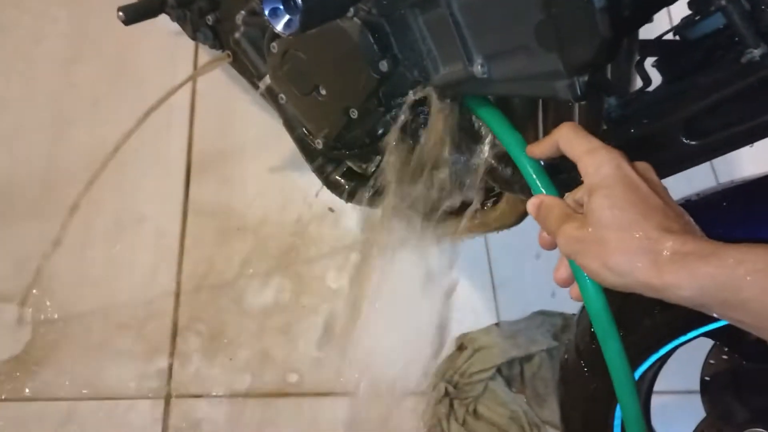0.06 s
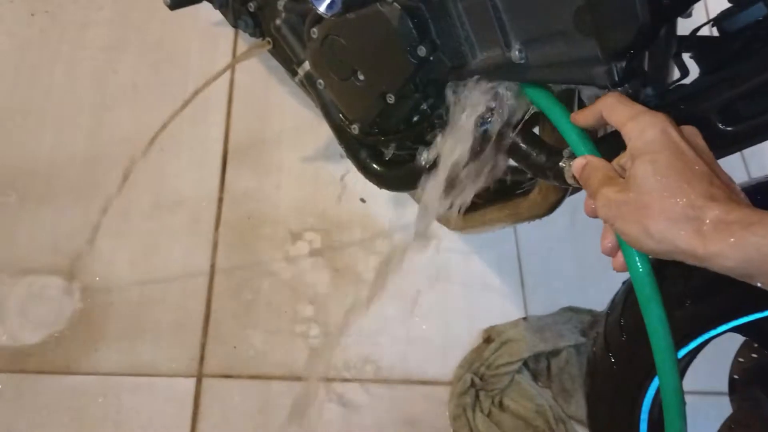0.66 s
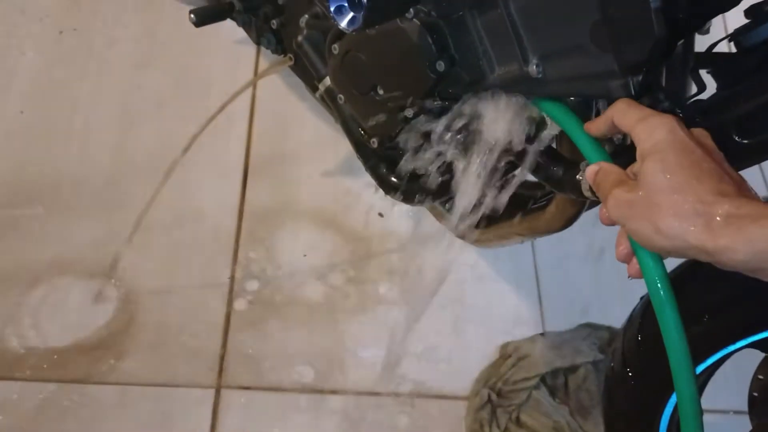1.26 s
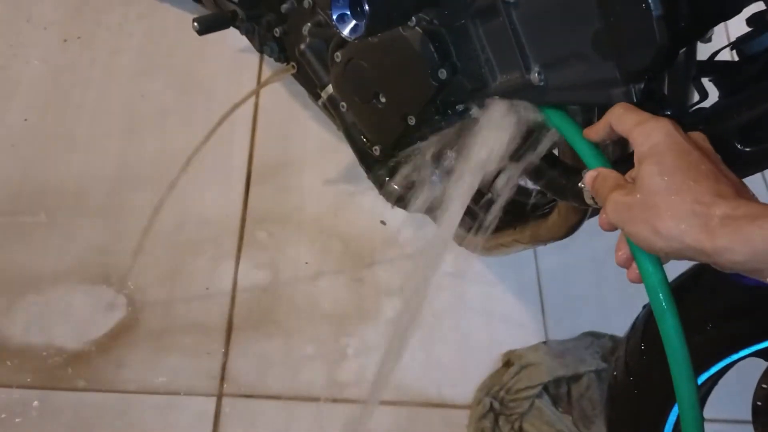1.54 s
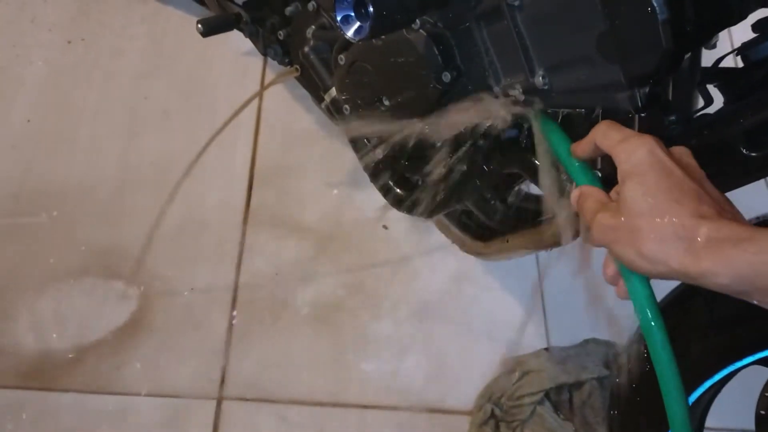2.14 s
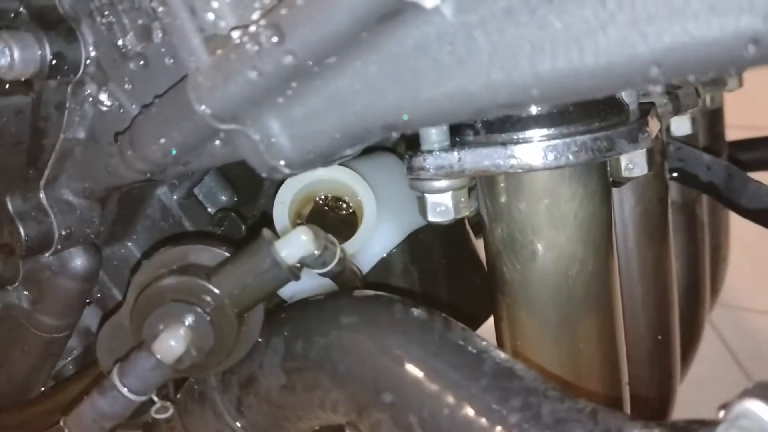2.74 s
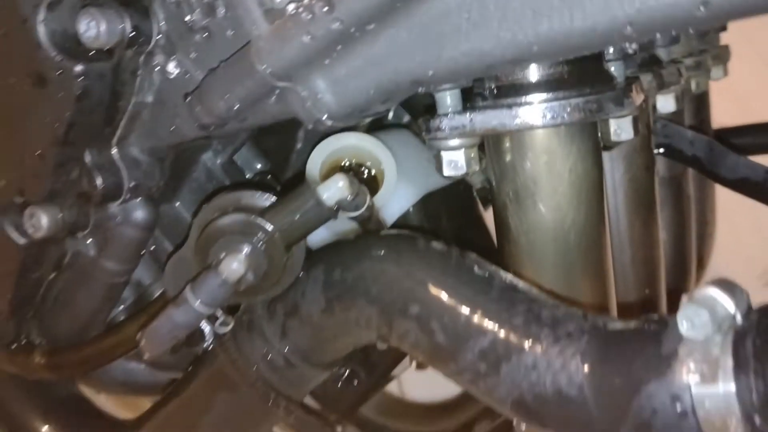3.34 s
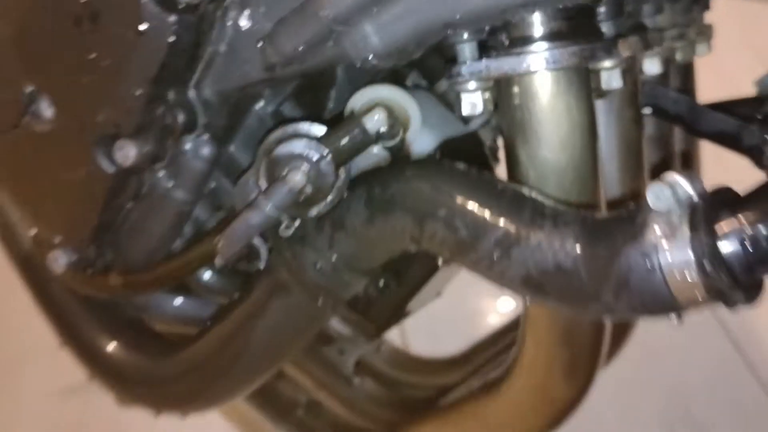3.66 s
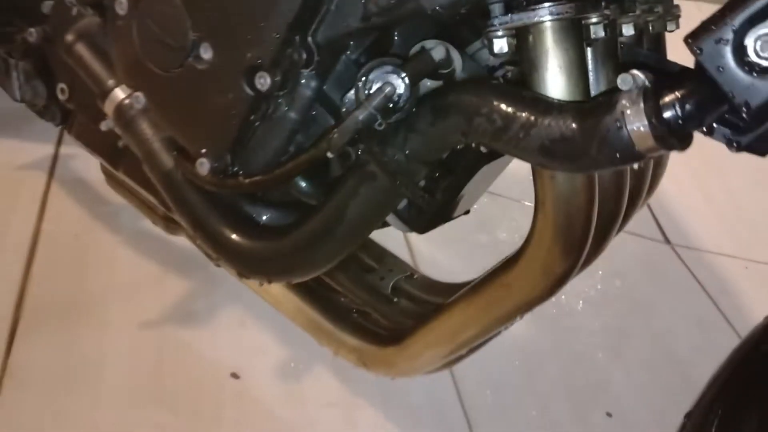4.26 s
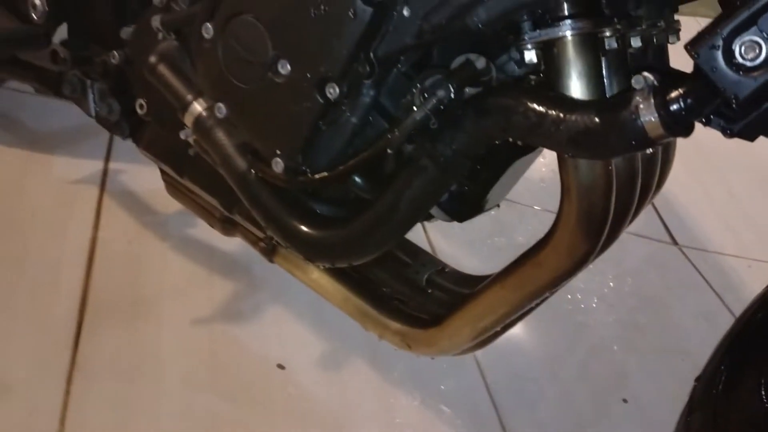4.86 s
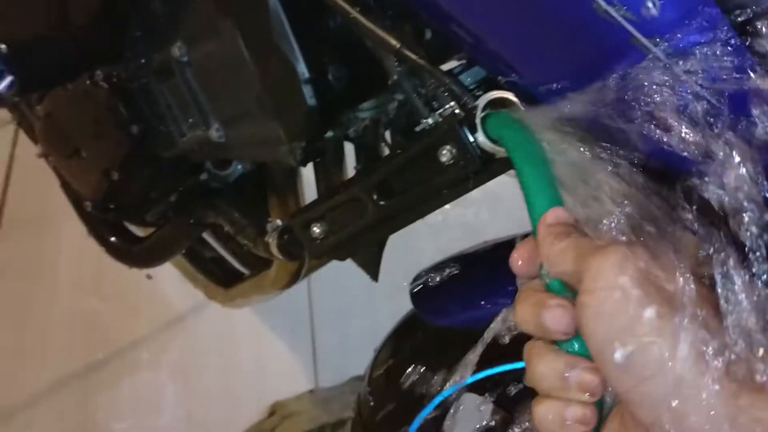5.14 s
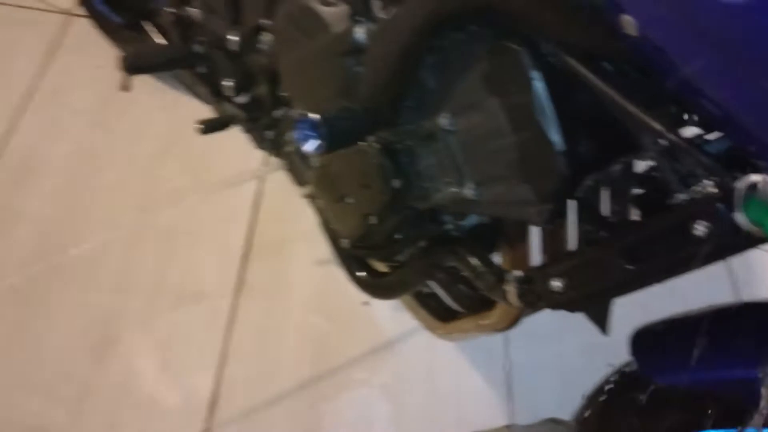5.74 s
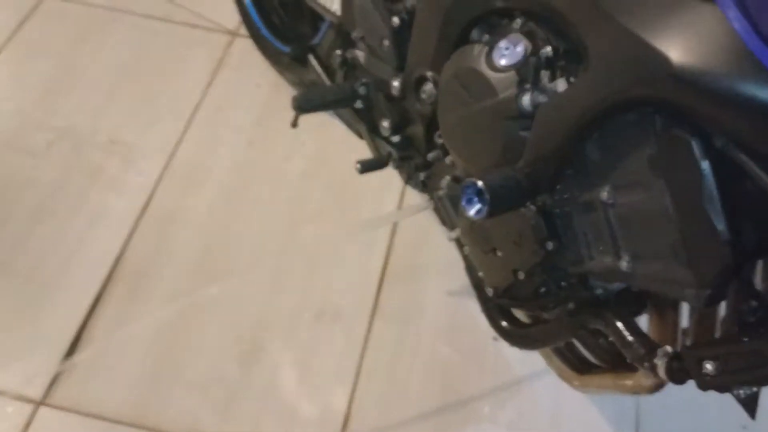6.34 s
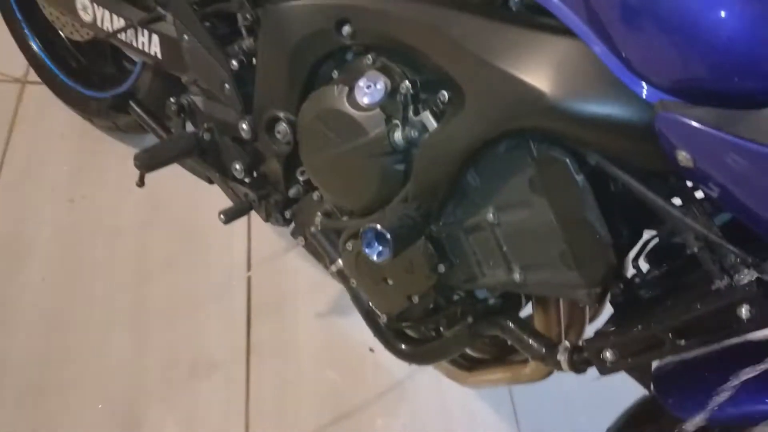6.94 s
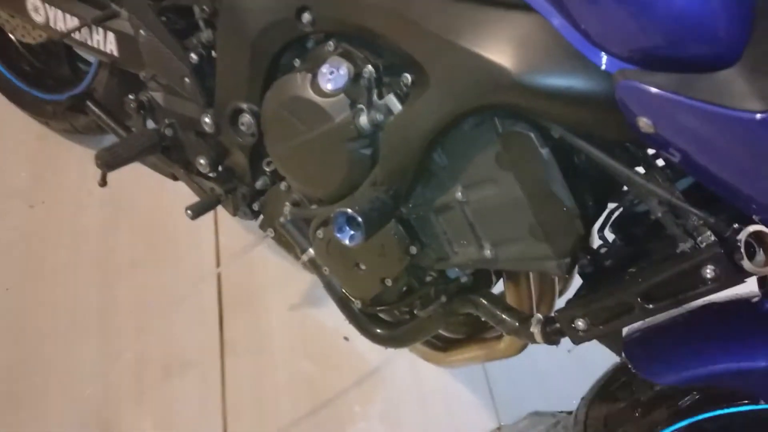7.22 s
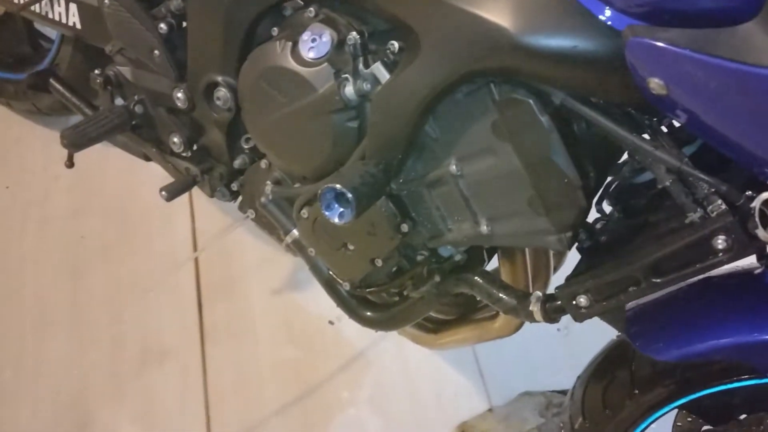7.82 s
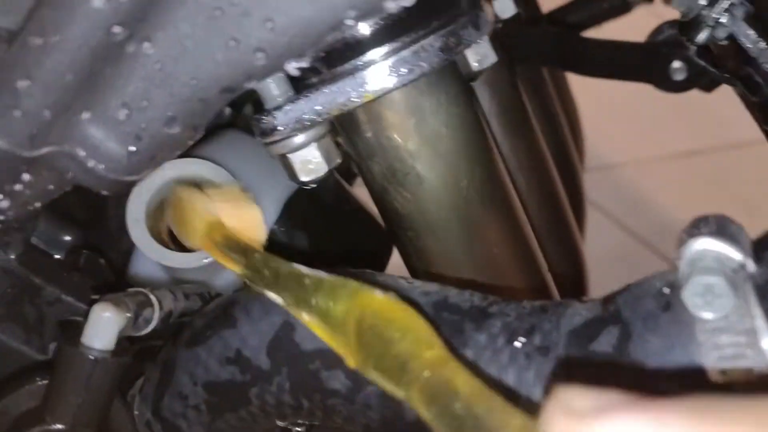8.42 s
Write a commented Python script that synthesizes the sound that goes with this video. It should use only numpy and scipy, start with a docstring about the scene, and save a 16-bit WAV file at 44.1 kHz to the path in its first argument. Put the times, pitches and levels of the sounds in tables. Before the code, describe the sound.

Close up in a tiled workshop, a full stream of water pours over an engine and splatters unevenly on the floor. Suddenly only thin runoff and ticking drips remain. A softer hissing rinse follows, with scattered popping drops, until a low machine hum takes over and bristles briefly flick and scrub. The microphone takes occasional soft handling thuds, and traffic hums very faintly far away.

```python
"""Hose water gushes off a motorcycle engine and slaps the floor of a tiled workshop, close to the mic.
Three hard cuts follow: the wet engine drips; a gentler stream patters over the bodywork; a small brush
taps and scrubs a fitting over a machine's rumble. The water is a mass of tiny impacts and ringing air
bubbles, with heavy gobs and drops that crack and pop. Traffic hums far off, and now and then the hand
bumps the narrow-band microphone."""
import sys
import numpy as np
from scipy import signal
from scipy.fft import rfft, irfft
from scipy.io import wavfile

SR = 44100
rng = np.random.default_rng(int(sys.argv[2]) if len(sys.argv) > 2 else 0)


def generate_wav(sig):
    """Save sig (samples, or channels by samples) to the path in sys.argv[1] as 16-bit PCM at SR."""
    pcm = np.round(np.clip(np.atleast_2d(sig).T, -1, 1) * 32767).astype(np.int16)
    wavfile.write(sys.argv[1], SR, pcm)


N = 383229
T = np.arange(N) / SR
DRIP_START, RINSE_START, BRUSH_START = 2.508, 5.035, 8.065   # the cuts, in seconds

# Strength of the three streams, heard as fine spray. Each row: time in seconds, relative level in dB.
GUSH_FLOW = [(0, -47.5), (0.36, -48.5), (0.54, -47.5), (0.68, -43.5), (0.92, -44.5), (1.12, -45),
             (1.3, -45.5), (1.5, -45), (1.68, -46.5), (1.92, -44.0), (2.06, -46.5), (2.3, -47), (2.5, -45)]
TRICKLE_FLOW = [(2.53, -71.5), (2.8, -76.5), (3.45, -71.5), (3.65, -77.5), (3.9, -73.5), (4.3, -71.5),
                (5.02, -73)]
RINSE_FLOW = [(5.05, -61.5), (5.55, -61.5), (5.95, -65), (6.07, -67.0), (6.25, -63.5), (6.55, -64.5),
              (6.78, -59.5), (6.9, -68.5), (7.15, -60.5), (7.57, -67), (7.68, -61.5), (8.05, -63.5)]
# Tone of each stream at the mic. Each row: frequency in Hz, relative level in dB.
GUSH_SPECTRUM = [(150, -35.5), (270, -22), (400, -21), (700, -18), (1350, -16.5), (1900, -6.5),
                 (2400, -2.5), (3100, -2), (4200, -2.5), (5100, -5), (6300, 0), (8000, -2)]
TRICKLE_SPECTRUM = [(800, -20.5), (2000, -16.5), (3600, -12), (5000, -5.5), (7000, 4.5)]
RINSE_SPECTRUM = [(300, -5.5), (1400, -19.5), (2200, -13), (3100, -6), (4100, 0.5), (5100, -5.5), (7200, 6),
                  (8000, 0.5)]
# The biggest gobs slapping the floor. Each row: start in seconds, relative peak in dB, pop pitch in Hz.
FLOOR_SPLATS = [(0.052, -30, 6420), (0.1389, -32, 5600), (0.1882, -29.5, 6500), (0.2519, -28, 3970),
                (0.2835, -29.5, 4430), (0.413, -31.5, 2480), (0.4368, -26, 6160), (0.6431, -28, 2940),
                (0.7628, -26.5, 2700), (0.8596, -27.5, 5870), (0.8998, -25.5, 2720), (0.9514, -30, 2990),
                (1.2175, -27.5, 2740), (1.2728, -24.5, 6600), (1.3853, -31, 6860), (1.4428, -27, 5950),
                (1.4663, -27, 6080), (1.5696, -28.5, 4100), (1.6434, -33.5, 5780), (1.8417, -29.5, 3270),
                (1.964, -29, 7000), (1.987, -27.5, 3850), (2.1857, -29, 4240), (2.2379, -29, 4980),
                (2.4242, -24.5, 2500)]
# Room tone, held until the next row. Each row: start in seconds, relative rumble and air levels in dB.
ROOM_LEVELS = [(0.0, -60.5, -69.5), (DRIP_START, -71, -85.5), (RINSE_START, -74, -83)]
# The workshop's rumble and air. Each row: frequency in Hz, relative level in dB.
RUMBLE_SPECTRUM = [(15, 0), (35, 2), (60, -7.5), (105, -5.5), (160, -15), (250, -29), (1500, -71.5)]
AIR_SPECTRUM = [(100, -19), (260, -0.5), (450, -3.5), (800, -3.5), (1150, 0), (1500, -2.5), (2300, -9.5),
                (8000, -13)]
# Handling thuds on the mic. Each row: start in seconds, peak in dB.
MIC_BUMPS = [(0.247, -48), (0.438, -49), (0.617, -51.5), (1.281, -45), (1.55, -47), (2.179, -45.5),
             (2.462, -36), (3.843, -58), (3.952, -51), (4.02, -55.5), (4.157, -55), (4.792, -47.5),
             (4.909, -56), (6.238, -60)]
# Surfacing bubbles. Each row: start in seconds, dry peak in dB, first pitch in Hz, rise in octaves,
# length in seconds.
BUBBLE_CHIRPS = [(0.412, -42.5, 2260, 0.21, 0.017), (0.764, -42, 2620, 0.093, 0.01),
                 (0.955, -36.5, 2870, 0.106, 0.0054), (2.328, -50, 1210, 0.18, .016),
                 (3.496, -66.5, 3000, 0.66, 0.0089), (5.55, -45.5, 1710, 1.8, 0.0057),
                 (5.918, -51.5, 1887, 1.5, 0.007)]
# Engines far off. Each row: start and length in seconds, pitch in Hz, level before flutter in dB.
FAR_ENGINES = [(1.9, 0.71, 119.7, -67), (3.3, 0.73, 97.5, -69.5), (5.05, 1.73, 362.5, -82.5),
               (6.4, 0.7, 104, -78), (6.99, 0.4, 134.3, -77.5), (7.253, 0.46, 260, -82.5)]
# The biggest single drops. Each row: start in seconds, relative peak in dB, pop pitch in Hz.
BIG_DROPS = [(2.6249, -48, 6800), (2.6917, -52, 7040), (2.9567, -58, 6100), (3.1397, -51, 7650),
             (3.2781, -52, 7040), (3.711, -55, 6660), (3.863, -51.5, 7000), (3.9133, -54, 5300),
             (3.9893, -51, 6900), (4.1063, -50.5, 6740), (4.2203, -48.5, 6200), (4.4077, -45, 7200),
             (4.5839, -51, 4130), (4.873, -55, 6800), (5.0853, -49, 4490), (5.3222, -48, 4000),
             (5.3778, -49, 4100), (5.4704, -43, 6240), (5.6015, -45, 3330), (5.7557, -46.5, 7800),
             (5.8484, -49.5, 3300), (5.916, -45, 2260), (5.9846, -47, 3940), (6.1621, -40, 6560),
             (6.7433, -44.5, 5690), (7.0023, -38.5, 7200), (7.1612, -45.5, 3370), (7.2464, -48.5, 2980),
             (7.3501, -40.5, 7250), (7.653, -48.5, 7400)]
# Sheets of water sliding off the bodywork. Each row: start and length in seconds, level in dB,
# centre and bandwidth in Hz.
WATER_SHEETS = [(5.545, 0.033, -66, 2900, 1500), (6.01, 0.18, -81.5, 1000, 704),
                (6.42, 0.21, -81.5, 900, 700), (6.63, 0.079, -68.5, 2760, 894),
                (6.69, 0.14, -77, 1240, 910), (7.055, .05, -71, 2360, 700),
                (7.351, 0.047, -59.5, 2723, 1200), (7.68, 0.2, -75.5, 980, 704), (7.82, 0.3, -77, 570, 450)]
# The machine's rumble. Each row: frequency in Hz, relative level in dB.
MACHINE_SPECTRUM = [(15, -26), (25, 5.5), (76, -4.5), (144, -12.5), (283, -15.5), (327, -19.5),
                    (436, -18.5), (740, -26), (1010, -25), (1320, -32), (1980, -33.5), (2400, -35.5),
                    (3620, -37), (6750, -34.5), (7800, -41), (10100, -49), (17200, -120)]
# Its hum and whine. Each row: pitch in Hz, rms level in dB.
MACHINE_TONES = [(85, -58.5), (113, -58.5), (426, -74.5), (606, -70.5), (1007, -77), (6541, -71),
                 (6874, -76)]
# Bristle strokes. Each row: start and length in seconds, dry level in dB, centre and bandwidth in Hz.
BRISTLE_STROKES = [(8.249, 0.032, -61, 3045, 500), (8.25, 0.027, -57.5, 7000, 1800),
                   (8.515, 0.22, -71, 2700, 298), (8.604, 0.1, -64, 7100, 1400),
                   (8.648, 0.046, -51.5, 3240, 1010)]
# The brush head knocking on the fitting. Each row: time in seconds, relative strength in dB.
BRUSH_TAPS = [(8.2518, -44), (8.2598, -41), (8.2609, -33.5), (8.2966, -26)]
# The fitting's modes. Each row: pitch in Hz, relative level in dB, seconds to die away by 60 dB.
FITTING_MODES = [(1490, -0.5, 0.007), (2400, 3, 0.0152), (3357, -2, 0.0091), (4120, -5.5, 0.0168),
                 (4820, 2.5, 0.0084), (5965, -1, 0.011), (6900, 3.5, 0.0046)]


def from_db(db):
    """Decibels to gain."""
    return 10 ** (np.asarray(db) / 20)


def rms_one(x):
    """Scale to unit rms."""
    return x / np.sqrt(np.mean(x ** 2) + 1e-20)


def in_time(curve):
    """A curve's level at every sample."""
    return np.interp(T, *np.transpose(curve))


def during(start, end):
    """True between two times."""
    return (T >= start) & (T < end)


def add(out, s, sound):
    """Mix a short sound in at s seconds."""
    at = max(round(s * SR), 0)
    out[at:at + len(sound)] += sound[:N - at]


def drift(rate_hz):
    """A slow random wander of unit rms."""
    step, run_in = 40, 2000
    r = np.exp(-2 * np.pi * rate_hz * step / SR)
    slow = signal.lfilter([1], [1, -2 * r, r * r], rng.standard_normal(N // step + run_in + 2))[run_in:]
    return np.interp(np.arange(N) / step, np.arange(len(slow)), rms_one(slow))


def band(x, low_hz, high_hz, order=2):
    """Band-pass filter."""
    return signal.sosfilt(signal.butter(order, [low_hz, high_hz], "band", fs=SR, output="sos"), x + 1e-18)


def coloured(x, spectrum, size=16384):
    """Shape x to a spectrum with a minimum-phase filter, which keeps attacks sharp; unit rms."""
    hz, db = np.transpose(spectrum)
    bin_hz = np.arange(size // 2 + 1) * SR / size
    gain = from_db(np.interp(np.log(bin_hz + 1), np.log(hz), db))
    cepstrum = irfft(np.log(gain))[:size // 2]
    cepstrum[1:] *= 2
    response = irfft(np.exp(rfft(cepstrum, size)))
    return rms_one(signal.oaconvolve(x, response)[:N])


def gush(fizz):
    """The full stream pours off the engine and slaps the floor near the mic."""
    spray_db, gobs_db = surges(GUSH_FLOW, FLOOR_SPLATS, spray_db=4.5, gobs_db=-9.0, gobs_follow=2.2,
                               wash_db=-18.5, heavy_db=-24.0, heavy_db_per_octave=1.0, wash_s=0.023)
    thinning_db = thinning(FLOOR_SPLATS)
    stream = flow(spray_db + thinning_db, gobs_db + thinning_db, GUSH_SPECTRUM, fizz,
                  per_s=6000, spread_db=1.5, clump_db=2.5, fizz_db=-7.5)
    return stream + impacts(FLOOR_SPLATS, crack_db=0.5, pop_db=-8.5, pop_width=0.2, contact_s=0.0011,
                            near_db=-2.0, far_db=-1.5, near_s=0.017, far_s=0.26)


def surges(curve, hits, spray_db, gobs_db, gobs_follow, wash_db, heavy_db, heavy_db_per_octave, wash_s):
    """Spray and gob levels in dB: both follow the flow; each hit adds a wash, heavier if it pops low."""
    wash_rise_s, big_gob_hz = 0.0027, 2820
    level = in_time(curve)
    usual = np.mean(np.array(curve)[:, 1])
    power = from_db([level + spray_db, usual + gobs_db + gobs_follow * (level - usual)]) ** 2
    t = T[:SR // 4]
    wash = np.exp(-t / wash_s) * (1 - np.exp(-t / wash_rise_s))
    for s, db, hz in hits:
        weight_db = heavy_db + heavy_db_per_octave * np.log2(big_gob_hz / hz)
        add(power[0], s, (from_db(db + wash_db) * wash) ** 2)
        add(power[1], s, (from_db(db + weight_db) * wash) ** 2)
    return 10 * np.log10(power)


def thinning(hits, depth_db=2.0, gather_s=0.019):
    """The stream thins for a moment while each gob gathers: the dip in dB."""
    nearness, t = np.zeros(N), T[:int(gather_s * SR)]
    for s, _, _ in hits:
        add(nearness, s - gather_s, np.sqrt(t / gather_s))
    return -depth_db * np.minimum(nearness, 1)


def flow(spray_db, gobs_db, spectrum, fizz, per_s, spread_db, clump_db, fizz_db, split_hz=3400):
    """Impacts and bubbles on wet tiles; fine spray makes the treble, heavy gobs the middle."""
    clicks = droplets(per_s, spread_db, clump_db)
    patter = scattered(clicks, near_db=-0.5, far_db=-8.5, near_s=0.0027, far_s=0.046)
    water = coloured(rms_one(patter) + from_db(fizz_db) * fizz, spectrum)
    gobs = signal.sosfilt(signal.butter(3, split_hz, "low", fs=SR, output="sos"), water)
    spray = signal.sosfilt(signal.butter(3, split_hz, "high", fs=SR, output="sos"), water)
    return from_db(spray_db) * rms_one(spray) + from_db(gobs_db) * rms_one(gobs)


def droplets(per_s, spread_db, clump_db, clump_hz=28):
    """Random clicks of unequal size, swelling in clumps as the stream breaks up."""
    sizes = from_db(spread_db * np.minimum(rng.exponential(1, N), 4)) * rng.choice([-1, 1], N)
    lands = rng.random(N) < per_s / SR
    clumps = from_db(clump_db * np.tanh(drift(clump_hz) / 2) * 2)
    return sizes * lands * clumps


def scattered(clicks, near_db, far_db, near_s, far_s):
    """Each impact reaches the mic with its own echoes: quick off the engine, slow off the walls."""
    power = 0
    for db, decay_s in (near_db, near_s), (far_db, far_s):
        r = np.exp(-2 / (decay_s * SR))
        power = power + from_db(db) ** 2 * signal.lfilter([1 - r], [1, -r], clicks ** 2 + 1e-18)
    return clicks + np.sqrt(power) * rng.standard_normal(len(clicks))


def bubbles(low_hz, high_hz, cycles, rise, count):
    """Trapped air: each bubble rings at its own slightly rising pitch; a few are much louder."""
    when, pitch, rank = rng.random((count, 3)).T[..., None]
    hz = low_hz * (high_hz / low_hz) ** pitch
    age = np.arange(SR // 35)
    life = hz * age / SR / cycles   # reaches 1 when the ring is 60 dB down
    envelope = np.sqrt(hz / (rank + 0.079)) * from_db(-60 * life)
    rings = envelope * np.sin(2 * np.pi * cycles * life * (1 + rise * life))
    samples = (when * N).astype(int) + age
    return rms_one(np.bincount(samples.ravel(), rings.ravel(), N)[:N])


def room_tone():
    """The workshop behind the water: uneven rumble and steady air, stepping at the first two cuts."""
    starts, rumble_db, air_db = np.transpose(ROOM_LEVELS)
    row = np.searchsorted(starts[1:], T)
    rumble = from_db(rumble_db[row] + 2.0 * drift(9.9)) * coloured(rng.standard_normal(N), RUMBLE_SPECTRUM)
    air = from_db(air_db[row] + 7.0) * coloured(rng.standard_normal(N), AIR_SPECTRUM)
    return rumble + air


def impacts(hits, crack_db, pop_db, pop_width, contact_s, **echoes):
    """Water lands with a broad crack and the damped pop of the cavity it opens."""
    out, t = np.zeros(N), T[:SR // 4]
    for s, peak_db, hz in hits:
        contact = rng.standard_normal(len(t)) * np.exp(-t / contact_s)
        crack = band(scattered(contact, **echoes), 0.5 * hz, 9800)
        pop = band(crack, hz / (1 + pop_width), hz * (1 + pop_width), order=1)
        for db, part in (crack_db, crack), (pop_db, pop):
            add(out, s + 0.000992, from_db(peak_db + db) * part / np.abs(part).max())
    return out


def mic_bumps(rise_s=0.0045, dull_hz=115, settle_db=-16.0, settle_s=0.041):
    """Dull thuds as the hand shifts on the microphone, with a low rustle while it settles."""
    out, t = np.zeros(N), T[:SR // 4]
    dull = signal.butter(4, dull_hz, fs=SR, output="sos")
    envelope = t / rise_s * np.exp(1 - t / rise_s) + from_db(settle_db) * np.exp(-t / settle_s)
    for s, db in MIC_BUMPS:
        thud = signal.sosfilt(dull, rng.standard_normal(len(t)) * envelope)
        add(out, s, from_db(db) * thud / np.abs(thud).max())
    return out


def plips():
    """A surfacing bubble shortens its neck and its pitch climbs."""
    out = np.zeros(N)
    for s, db, hz, octaves, length in BUBBLE_CHIRPS:
        age = np.linspace(0, 1, int(length * SR))
        phase = 2 * np.pi * np.cumsum(hz * 2 ** (octaves * age)) / SR
        add(out, s, from_db(db) * np.sin(np.pi * age) * np.sin(phase))
    return out


def workshop(x, wet_db, t60=0.32):
    """The direct sound plus its short tail off the tiled walls."""
    t = T[:SR // 2]
    tail = rng.standard_normal(len(t)) * np.exp(-np.log(1000) * t / t60)
    return x + from_db(wet_db) * signal.oaconvolve(x, tail / np.linalg.norm(tail))[:N]


def traffic():
    """Far from the mic, engines swell and fade, each a wavering tone."""
    out = np.zeros(N)
    engine_time = np.cumsum(1 + 0.018 * drift(10)) / SR
    flutter = from_db(2.6 * drift(13))
    for s, length, hz, db in FAR_ENGINES:
        on = during(s, s + length)
        swell = np.sqrt(np.abs(np.sin(np.pi * (T[on] - s) / length)))
        out[on] += from_db(db) * swell * flutter[on] * np.sin(2 * np.pi * hz * engine_time[on])
    return out


def trickle(fizz):
    """Thin runoff from the wet engine, with tiny drops ticking on the metal."""
    level_db = in_time(TRICKLE_FLOW) + 3.4
    runoff = flow(level_db - 1.0, level_db - 10.0, TRICKLE_SPECTRUM, fizz,
                  per_s=2500, spread_db=3.0, clump_db=-2.5, fizz_db=-12.0)
    ticks = bubbles(low_hz=5720, high_hz=7760, cycles=44, rise=0.06, count=220)
    return runoff + from_db(level_db - 9.5) * ticks


def drips():
    """Single drops, big and small, fall from the wet engine and the bodywork."""
    small = stray_drops(TRICKLE_FLOW, above_db=13.5, spread_db=8.0, low_hz=4230, high_hz=7700, count=16)
    small += stray_drops(RINSE_FLOW, above_db=8.5, spread_db=9.0, low_hz=3250, high_hz=7350, count=20)
    return impacts(list(BIG_DROPS) + small, crack_db=-3.5, pop_db=2.0, pop_width=0.085, contact_s=0.00085,
                   near_db=-5.5, far_db=-4.5, near_s=0.0069, far_s=0.049)


def stray_drops(curve, above_db, spread_db, low_hz, high_hz, count):
    """Small drops at uneven intervals, as strong as the flow that feeds them: rows like BIG_DROPS."""
    s, level = np.transpose(curve)
    when, size, pitch = rng.random((count, 3)).T
    times = s[0] + (s[-1] - s[0]) * (np.arange(count) + when) / count
    peaks = np.interp(times, s, level) + above_db + spread_db * (size - 0.5)
    return list(zip(times, peaks, high_hz * (low_hz / high_hz) ** (pitch ** 2)))


def rinse(fizz):
    """A gentler stream runs over the bodywork; stray drops patter sharply on the tiles."""
    spray_db, gobs_db = surges(RINSE_FLOW, BIG_DROPS, spray_db=1.0, gobs_db=-10.0, gobs_follow=0.71,
                               wash_db=-15.5, heavy_db=-20.5, heavy_db_per_octave=4.5, wash_s=0.043)
    stream = flow(spray_db, gobs_db, RINSE_SPECTRUM, fizz,
                  per_s=4000, spread_db=3.5, clump_db=2.0, fizz_db=-7.5)
    clicks = droplets(per_s=82, spread_db=3.0, clump_db=-1.0)
    patter = scattered(clicks, near_db=3.5, far_db=1.5, near_s=0.0026, far_s=0.021)
    return stream + from_db(spray_db - 3.0) * rms_one(band(patter, 3180, 10500)) + swishes(WATER_SHEETS)


def swishes(rows):
    """Water or bristles sliding over a surface: grainy noise that swells quickly and fades."""
    out = np.zeros(N)
    for s, length, db, hz, width_hz in rows:
        age = np.linspace(0, 1, int(length * SR))
        grains = rng.standard_normal(len(age)) * rng.exponential(1, len(age))
        hiss = band(grains, hz - width_hz / 2, hz + width_hz / 2)
        add(out, s, from_db(db) * rms_one(hiss * age ** 0.083 * (1 - age)))
    return out


def machine(rumble_db=-48.0, waver=0.003):
    """A machine behind the brush: broad rumble, with hum and whine that waver with the motor's speed."""
    motor_time = np.cumsum(1 + waver * drift(9.6)) / SR
    tones = sum(from_db(db) * np.sqrt(2) * np.sin(2 * np.pi * hz * motor_time) for hz, db in MACHINE_TONES)
    return from_db(rumble_db) * coloured(rng.standard_normal(N), MACHINE_SPECTRUM) + tones


def brush(tap_db=-12.5):
    """Bristles flick across the fitting's rim; the head knocks on it and sets it ringing."""
    knocks = np.zeros(N)
    for s, db in BRUSH_TAPS:
        add(knocks, s, from_db([db + tap_db]))
    fitting = sum((-1) ** k * from_db(db) * ring(knocks, hz, t60)
                  for k, (hz, db, t60) in enumerate(FITTING_MODES))
    return swishes(BRISTLE_STROKES) + fitting


def ring(x, hz, t60):
    """One mode of the fitting: each click starts a dying sine."""
    r, w = np.exp(-np.log(1000) / (t60 * SR)), 2 * np.pi * hz / SR
    return signal.lfilter([0, np.sin(w)], [1, -2 * r * np.cos(w), r * r], x + 1e-18)


def scene():
    """Four moments beside the motorcycle, cut end to end over room tone and far traffic; mono."""
    fizz = bubbles(low_hz=1104, high_hz=7980, cycles=54, rise=0.045, count=4000)
    water = gush(fizz) * (T < DRIP_START)
    water += trickle(fizz) * during(DRIP_START, RINSE_START)
    water += rinse(fizz) * during(RINSE_START, BRUSH_START)
    water += drips() + workshop(plips(), wet_db=-0.5)
    cleaning = (machine() + workshop(brush(), wet_db=-15.5)) * (T >= BRUSH_START)
    return (water + cleaning + room_tone() + traffic() + mic_bumps())[None]


def record(dry, flat_to_hz=7650, sheen_db=-27.5, top_sheen_db=-45.5, hiss_db=-95.0, cutoff_hz=15700):
    """A narrow-band mic channel, with a faint image of the sound above its band and a trace of hiss."""
    narrow = signal.sosfilt(signal.ellip(7, 0.3, 60, flat_to_hz, fs=SR, output="sos"), dry)
    image = narrow * np.cos(2 * np.pi * 8000 * T)
    sheen = from_db(sheen_db) * band(image, 9800, 11700, order=5)
    top_sheen = from_db(top_sheen_db) * band(image, 9000, 16000, order=3)
    hiss = from_db(hiss_db) * rng.standard_normal(N)
    top_cut = signal.ellip(10, 0.1, 80, cutoff_hz, fs=SR, output="sos")
    return signal.sosfilt(top_cut, narrow + sheen + top_sheen + hiss)


dry = scene()
out = record(dry)
generate_wav(out)
```